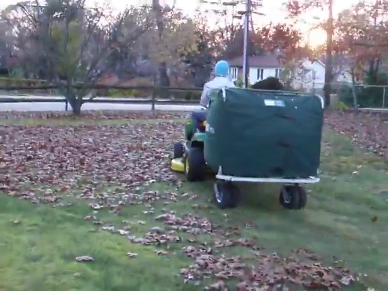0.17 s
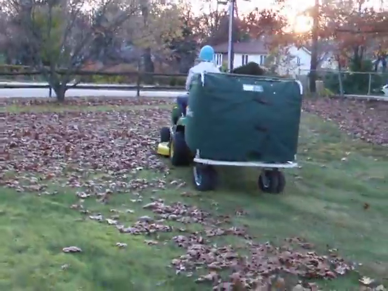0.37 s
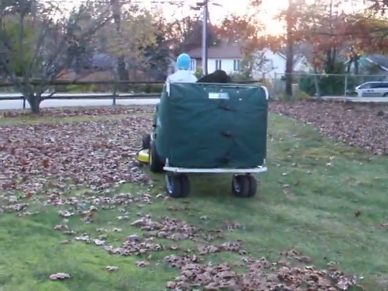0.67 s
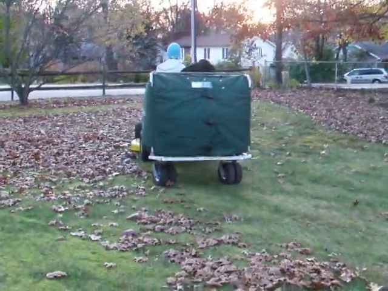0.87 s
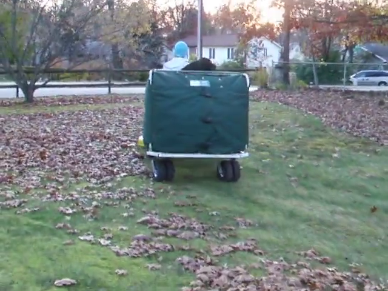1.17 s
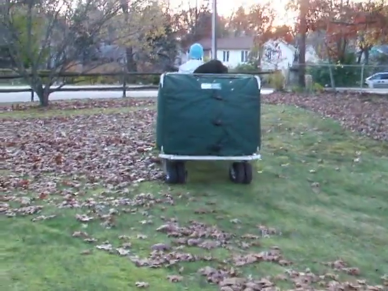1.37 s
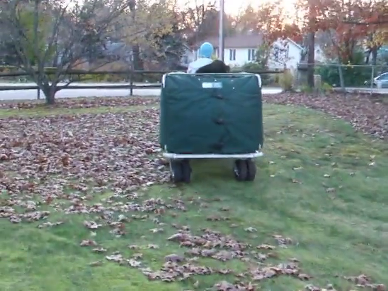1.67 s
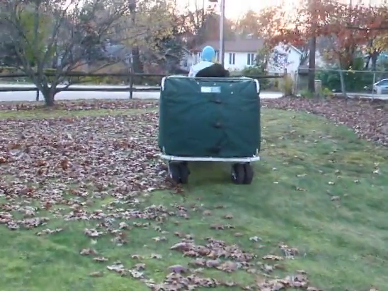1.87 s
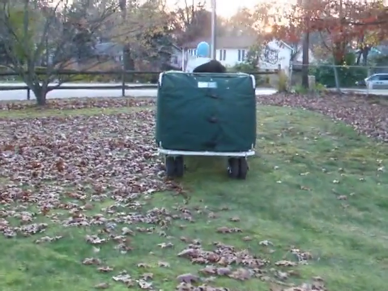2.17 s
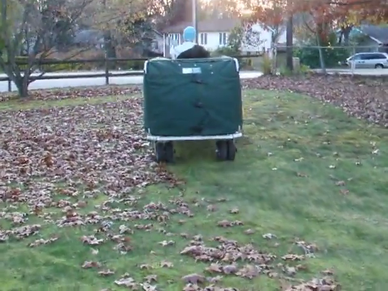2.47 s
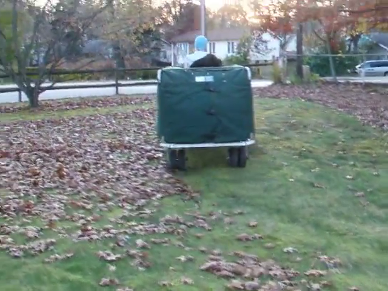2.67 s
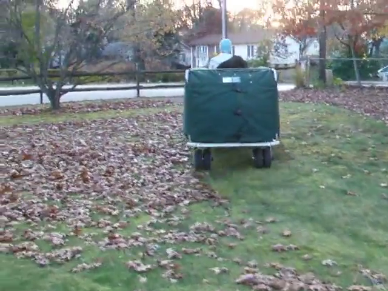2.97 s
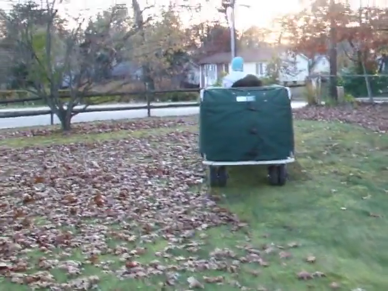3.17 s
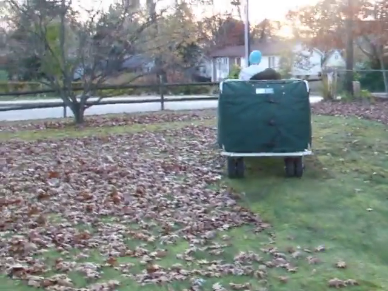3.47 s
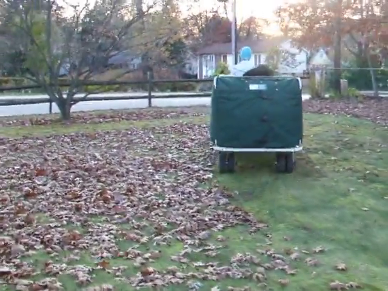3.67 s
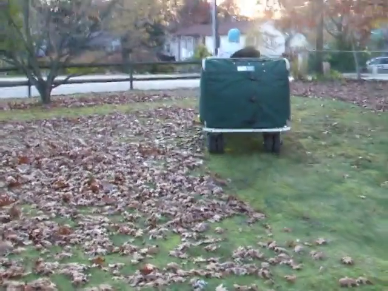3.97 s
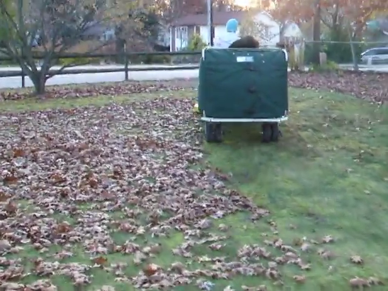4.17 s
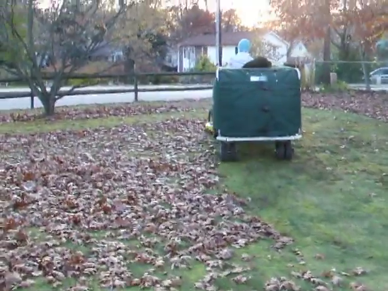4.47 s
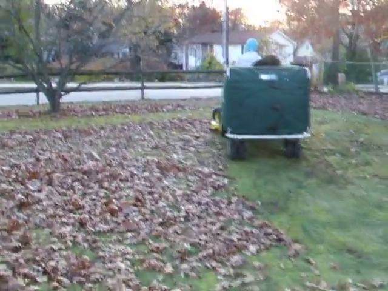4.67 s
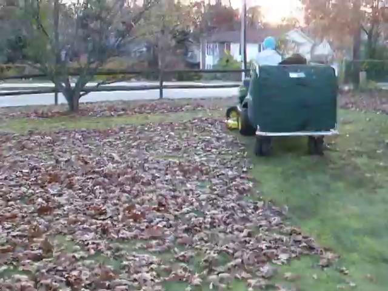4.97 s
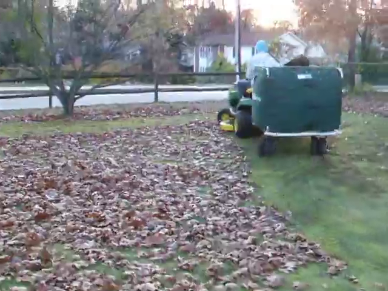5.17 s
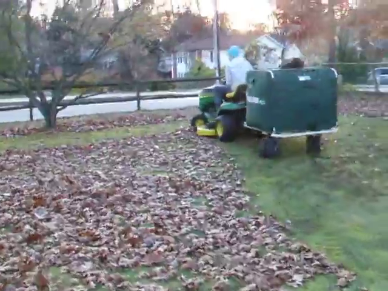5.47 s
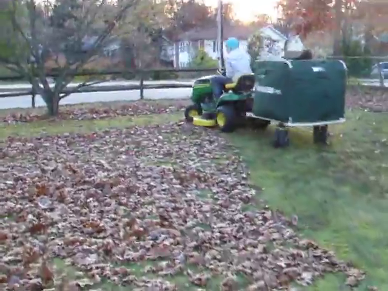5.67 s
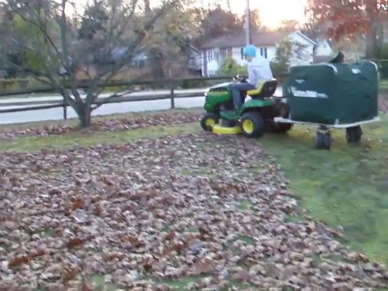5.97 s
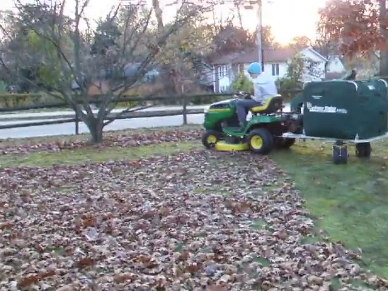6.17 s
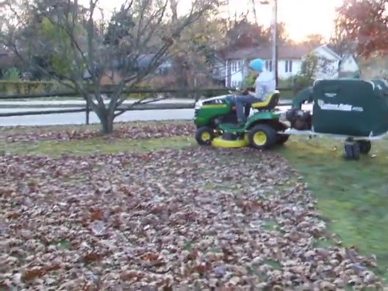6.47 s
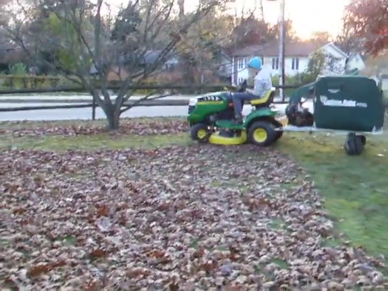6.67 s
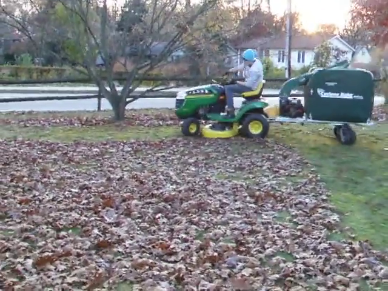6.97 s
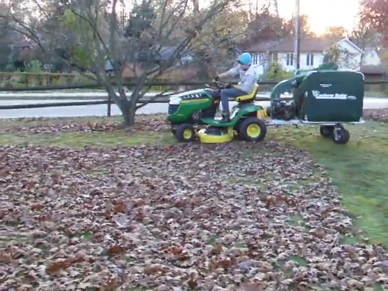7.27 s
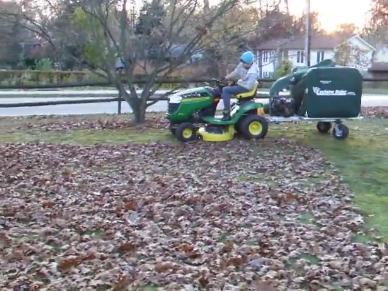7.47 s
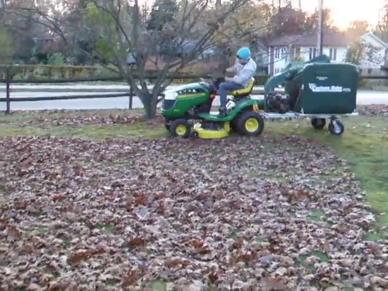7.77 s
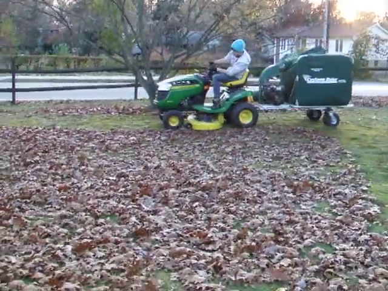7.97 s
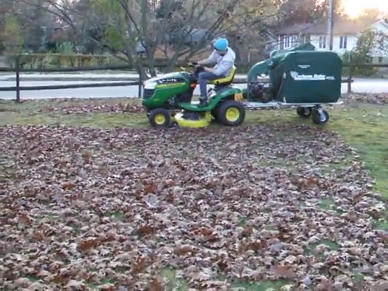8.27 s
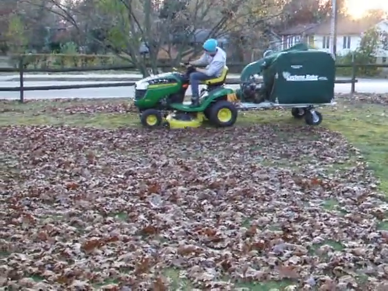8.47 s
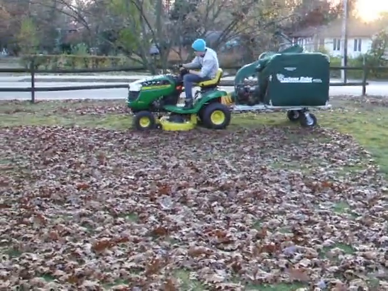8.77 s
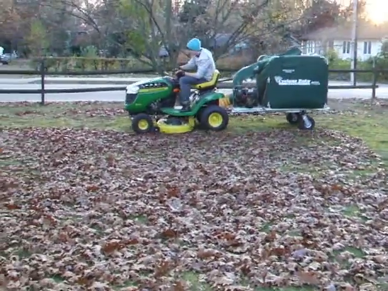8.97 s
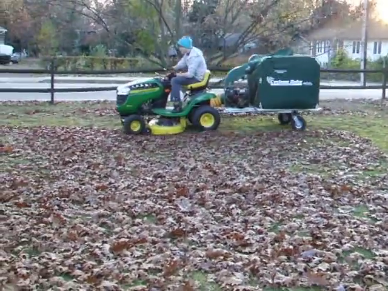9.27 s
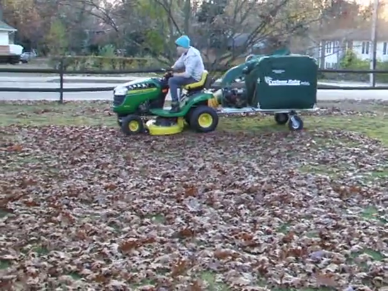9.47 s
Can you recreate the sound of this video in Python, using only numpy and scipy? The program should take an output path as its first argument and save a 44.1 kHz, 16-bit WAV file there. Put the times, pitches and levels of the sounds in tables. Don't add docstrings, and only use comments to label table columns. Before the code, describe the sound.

A continuous machine drone over an open lawn: thick, slightly wavering vacuum-fan hum, rough engine tones, buzzing mower blades, low rumble and rushing air. It recedes slightly, then turns broadside. The hum drops back while a raspy, rapidly chugging hiss comes forward, with brittle bursts of leaves and twigs in the fan. Plain, slightly gritty camera sound with limited treble.

```python
import sys
import numpy as np
from scipy import signal
from scipy.fft import rfft, irfft
from scipy.io import wavfile
from scipy.ndimage import uniform_filter1d

SR = 44100
rng = np.random.default_rng(int(sys.argv[2]) if len(sys.argv) > 2 else 0)


def convert_level_to_amplitude(level_db):
    exponent = np.asarray(level_db, float) / 20
    return 10 ** exponent


def wav_record(signal):
    frames = np.transpose(np.atleast_2d(signal))
    bounded = np.clip(frames, -1, 1)
    quanta = np.round(bounded * 32767).astype(np.int16)
    wavfile.write(sys.argv[1], SR, quanta)


N = 424241

# [t/s, f/Hz]
FAN_PITCH = [(0, 230.42), (.53, 228.43), (1.05, 231.01), (2.06, 230.45), (2.14, 228.51), (3.11, 229.35),
             (3.48, 228.48), (3.58, 229.86), (4.8, 230.26), (5.49, 229.06), (5.72, 231.31), (5.88, 227.75),
             (6.74, 228.89), (7.04, 230.71), (8.22, 230.54), (8.31, 232.0), (9.17, 228.65), (9.62, 229.02)]
# [t/s, level/dB]
FAN_LEVEL = [(0, -17), (.62, -16.5), (1.63, -16.5), (3.02, -16.5), (4.39, -15), (5.6, -18.5), (6.4, -19.5),
             (7.1, -17.5), (7.72, -26.5), (8.3, -19), (8.82, -21), (9.62, -20.5)]
# [multiple of firing rate, level from behind/dB, level from the side/dB]
VACUUM_TONES = [(1, -51.5, -56.5), (2, -46, -38), (3, -63, -56), (4, -46.5, -38), (5.03, -43, -39.5),
                (6, -47.5, -48.5), (7, -36.5, -42.5), (9, -37.5, -38), (10, -42.5, -48.5), (11, -57, -54),
                (13, -63, -56), (15, -54, -64.5), (16, -42.5, -49), (18, -59, -62), (20, -52, -55.5),
                (21, -54, -63), (23, -56, -62.5)]
# [t/s, firing cycle f/Hz]
TRACTOR_PITCH = [(0, 26.95), (1.5, 26.9), (2.3, 26.95), (4.8, 26.96), (5.7, 26.8), (6.3, 26.9),
                 (7.2, 26.97), (7.7, 27.13), (8.2, 26.95), (8.7, 26.88), (9.2, 27.02), (9.62, 27.05)]
# [multiple of firing rate, level from behind/dB, level from the side/dB]
TRACTOR_TONES = [(1, -61.5, -54), (2, -54, -49), (3, -55, -51), (4, -46, -48.5), (5, -43.5, -47),
                 (6.1, -48, -50.5), (8, -45, -46), (10, -50, -57), (12, -59, -51.5), (13, -61, -52.5),
                 (14, -63.5, -54), (15, -58, -51.5), (16, -51.5, -53.5), (18, -61.5, -54), (19, -63, -53),
                 (20, -52, -60.5), (22, -58, -56.5), (24, -54, -54), (28, -62, -52), (30, -70, -62),
                 (32, -67, -62.5), (36, -54.5, -51), (40, -63, -63)]
# [t/s, turned side-on 0 to 1, nearness level/dB]
POSE = [
    (0, 0.14, 0),
    (1.5, 0.29, 2),
    (3, 0.22, 0),
    (4.6, 0.17, -4.5),
    (5.5, 0.51, -3),
    (6.5, 0.87, 0),
    (7.7, 0.97, 1),
    (9.62, 0.93, 0.5),
]
# [multiple of blade rate, level/dB]
BLADE_OVERTONES = [(3, -51), (4, -55.5), (6, -53.5), (7, -52.5)]
# [t/s, level/dB, length/s]
CLUMPS = [(0.42, -30.5, 0.024), (0.731, -31.5, 0.01), (1.401, -26.5, 0.015), (1.463, -35, 0.04),
          (1.566, -30, 0.016), (1.996, -36.5, 0.014), (2.16, -31, 0.027), (3.996, -35, 0.033),
          (5.171, -39.5, 0.045), (5.797, -45, 0.033), (7.589, -33.5, 0.014), (7.63, -27, 0.018),
          (7.656, -27.5, 0.016), (7.689, -20, 0.033), (7.81, -26, .014), (7.937, -28, .014),
          (7.956, -26, 0.021), (8.043, -27.5, 0.033), (8.142, -29, 0.011), (8.84, -25.5, .045),
          (9.279, -26, 0.025), (9.394, -28, .015), (9.42, -27.5, .022), (9.57, -26, .012)]
# [t/s, flow level over the usual/dB]
LEAF_FLOW = [(0, 5.5), (.15, 5), (.7, 2.5), (1.3, 2), (1.5, 3.5), (1.75, 0.5), (2.4, 1.5), (3.3, 2),
             (3.95, 0.5), (4.6, -2), (5.2, -0.5), (6.2, 0.5), (7.1, -4), (7.35, 0), (7.68, 1), (8.2, 2),
             (8.6, -0.5), (9.62, 1)]
# [f/Hz, level per Hz/dB]
RUMBLE = [(1, -6), (5, -7), (12, -28.5), (25, -23.5), (40, -12), (70, -3.5), (110, 4), (160, 3), (210, -5),
          (280, 1), (330, -17), (450, -36.5)]
# [f/Hz, level per Hz/dB]
ROAR_REAR = [(180, -31.5), (300, -2), (400, -9), (500, -2), (570, 0.5), (630, -8), (780, -6), (870, -14.5),
             (1000, -11), (1150, -8), (1380, -20), (1560, -11), (2200, -23.5), (2900, -44.5)]
# [f/Hz, level per Hz/dB]
ROAR_SIDE = [(180, -30.5), (300, -3.5), (429, -9), (451, 0), (657, -1.5), (691, -0.5), (763, 2.5),
             (917, -5.5), (1100, 1), (1320, -4), (2200, -7), (2860, -17.5), (4840, -120)]
# [f/Hz, level per Hz/dB]
HISS_REAR = [(900, -30.5), (1500, -9.5), (2100, -6), (3300, -6), (4350, -7.5), (5350, -3), (5800, -5.5),
             (7100, -4), (8000, -7), (8400, -4.5)]
# [f/Hz, level per Hz/dB]
HISS_SIDE = [(900, -32.5), (1500, -8.5), (2200, -1), (2900, -4), (3900, -2.5), (4550, -3.5), (5000, 0.5),
             (6900, -1), (8000, -4), (8400, 7.5)]
# [f/Hz, level/dB]
SMOOTHING = [(6500, 0), (7400, 1.5), (8000, -3), (8370, -10.5), (8700, -22), (9000, -35.5), (9300, -44)]

BLADE_START, FIRING_AT = 0.44, 0.816
SHELL_DB, SHELL_HIDDEN_DB = -49, -23.5
SHELL_REAR_HZ, SHELL_SIDE_HZ, SHELL_SHIFT_S = 3370, 3850, 7.0
BELT_RATIO = 3.461
PASS_DB, SHADOW_DB = -36, -13.5
SHADOW_START_S, SHADOW_END_S, EDGE_S = 2.17, 6.0, 0.9
OCTAVE_DB, SWING_DB, SWING_S, SWING_TOP_S = -36.5, 3.5, 4.65, 2.4
THUD_DB = 1
SWISH_S, SWISH_LENGTH_S, SWISH_DB = 5.05, 1.13, -37
SWISH_START_HZ, SWISH_END_HZ = 775, 580
LOW_NOTE_LAG_S, LOW_NOTE_DB, LOW_NOTE_HZ = 0.28, -39.5, 510.0
HISS_DB, HISS_TURN_DB = -39, 10
ROAR_DB, ROAR_TURN_DB, ROAR_SHARE = -35.5, 3, 0.37
ROAR_NEAR, START_DB, START_S = 0.2, 5, 0.12
RUMBLE_DB, RUMBLE_NEAR, RUMBLE_SWAY_DB = -34, 0.17, 0.8
CAMERA_RATE, OFFSET = 16000, -0.0024


def evened(x):
    return x / np.sqrt(np.mean(x ** 2) + 1e-20)


def columns(rows):
    s, *values = np.transpose(rows)
    t = np.arange(N) / SR
    return [np.interp(t, s, v) for v in values]


def ramp(at, length):
    return np.clip((np.arange(N) / SR - at) / length + 0.5, 0, 1)


def drift(hz):
    f = np.fft.rfftfreq(N, 1 / SR)
    slow = rfft(rng.standard_normal(N)) * np.exp(-(f / hz) ** 2)
    return evened(irfft(slow, N))


def resonate(x, hz, width):
    turn = np.exp(2j * np.pi * np.cumsum(hz) / SR)
    r = np.exp(-np.pi * width / SR)
    once = signal.lfilter([1 - r], [1, -r], x / turn)
    twice = signal.lfilter([1 - r], [1, -r], once)
    return evened((turn * twice).real)


def noise(spectrum, patchy_db, size=512):
    frames, hz = 4 * N // size + 5, np.fft.rfftfreq(size, 1 / SR)
    a, b, patches = rng.standard_normal((frames, len(hz), 3)).T
    patches = uniform_filter1d(patches, size=6, axis=0)
    patches = evened(uniform_filter1d(patches, size=24, axis=1))
    f, db = np.transpose(spectrum)
    shape_db = np.interp(np.log(hz + 1), np.log(f + 1), db, left=-90, right=-90)
    z = (a + 1j * b) * convert_level_to_amplitude(shape_db[:, None] + patchy_db * patches)
    return evened(signal.istft(z, nperseg=size, noverlap=3 * size // 4)[1][:N])


def fan(cycle):
    wobble = 0.07 * drift(hz=25) + 0.43 * drift(hz=3.4)
    tone = np.sqrt(2) * np.cos(2 * np.pi * (8 * cycle + BLADE_START) + wobble)
    flutter_db = 0.5 * drift(hz=25.3) + 0.3 * drift(hz=19)
    firing_db = 0.2 * np.cos(2 * np.pi * (cycle - 0.3))
    return convert_level_to_amplitude(columns(FAN_LEVEL)[0] + flutter_db + firing_db) * tone


def engine_tones(cycle, table, side, near_db, waver_db):
    out, t = np.zeros(N), np.arange(N) / SR
    knots = np.arange(0, N / SR + 1, 0.01)

    def waver():
        steps = uniform_filter1d(rng.standard_normal(len(knots)), size=12)
        return np.interp(t, knots, evened(steps))

    for order, rear_db, side_db in table:
        swell, slip = waver(), waver()
        unrest = np.sqrt(order / 8)
        level_db = rear_db + side * (side_db - rear_db) + near_db + waver_db * unrest * swell
        angle = 2 * np.pi * (round(order) * cycle + rng.random()) + 0.27 * unrest * slip
        out += convert_level_to_amplitude(level_db) * np.cos(angle)
    return np.sqrt(2) * out


def engines(cycle, side, near_db):
    tractor_cycle = np.cumsum(columns(TRACTOR_PITCH)[0]) / SR
    vacuum = engine_tones(cycle, VACUUM_TONES, side, near_db, 2.63)
    tractor = engine_tones(tractor_cycle, TRACTOR_TONES, side, near_db, 2.0)
    return vacuum + tractor


def puffs(cycle):
    since = cycle - FIRING_AT
    sizes = convert_level_to_amplitude(0.9 * np.clip(rng.standard_normal(400), -2, 1.5))
    size = sizes[np.floor(since).astype(int) + 1]
    return uniform_filter1d(size * np.exp(-(since % 1) / 0.15), size=170)


def muffler(beat, side):
    hz = np.interp(ramp(SHELL_SHIFT_S, 0.3), (0, 1), (SHELL_REAR_HZ, SHELL_SIDE_HZ))
    level_db = SHELL_DB + SHELL_HIDDEN_DB * (1 - side) ** 2
    bursts = evened(np.maximum(beat - 0.15, 0))
    return convert_level_to_amplitude(level_db) * bursts * resonate(rng.standard_normal(N), hz, 620)


def mower_blades():
    hidden = ramp(SHADOW_START_S, EDGE_S) - ramp(SHADOW_END_S, EDGE_S)
    pass_db = PASS_DB + SHADOW_DB * hidden
    swing = np.cos(2 * np.pi * (np.arange(N) / SR - SWING_TOP_S) / SWING_S)
    octave_db = OCTAVE_DB + SWING_DB * swing
    hz = BELT_RATIO * columns(TRACTOR_PITCH)[0]
    angle = 2 * np.pi * np.cumsum(hz) / SR + 0.19 * drift(hz=4.5)
    first = convert_level_to_amplitude(pass_db + 1.3 * drift(hz=4.0)) * np.cos(angle)
    octave = convert_level_to_amplitude(octave_db + 2.0 * drift(hz=5.1)) * np.cos(2 * angle + 1)
    top = sum(convert_level_to_amplitude(db + 0.97 * drift(hz=1.0)) * np.cos(round(k) * angle) for k, db in BLADE_OVERTONES)
    return np.sqrt(2) * (first + octave + top)


def leaf_clumps(side):
    shape, t = np.zeros(N), np.arange(N) / SR
    for s, db, length in CLUMPS:
        part = slice(round(s * SR), round((s + 4 * length) * SR))
        u = (t[part] - s) / length
        shape[part] += convert_level_to_amplitude(db) * np.clip(u * 6, 0, 1) * np.exp(-1.5 * u)
    crackle = noise([(600, -23.5), (1500, -5), (3000, -2.5), (5500, 5.0), (8300, -6.0)], 3.7)
    thud = noise([(300, -14), (700, -0.5), (1200, -2), (2200, -6.5), (3500, -21.5)], 2.8)
    mix = (0.8 + 0.42 * side) * crackle + convert_level_to_amplitude(THUD_DB) * (1 - side) * thud
    return shape * convert_level_to_amplitude(2.7 * drift(hz=300)) * mix


def hose_swish():
    middle = SWISH_S + SWISH_LENGTH_S / 2
    early = ramp(middle, SWISH_LENGTH_S)
    late = ramp(middle + LOW_NOTE_LAG_S, SWISH_LENGTH_S)
    breath = rng.standard_normal(N)
    slide_hz = np.interp(early, (0, 1), (SWISH_START_HZ, SWISH_END_HZ))
    upper = np.sin(np.pi * early) * resonate(breath, slide_hz, 130)
    lower = np.sin(np.pi * late) * resonate(breath, np.full(N, LOW_NOTE_HZ), 120)
    return convert_level_to_amplitude(SWISH_DB) * upper + convert_level_to_amplitude(LOW_NOTE_DB) * lower


def air(beat, side, near_db):
    flow_db = columns(LEAF_FLOW)[0] + 0.27 * drift(hz=5.2)
    surge_db = START_DB * np.exp(-np.arange(N) / SR / START_S)
    roar_db = ROAR_DB + ROAR_TURN_DB * side + ROAR_SHARE * flow_db + ROAR_NEAR * near_db + surge_db
    hiss_db = HISS_DB + HISS_TURN_DB * side + flow_db
    rumble_db = RUMBLE_DB + RUMBLE_NEAR * near_db + RUMBLE_SWAY_DB * drift(hz=0.91)
    gusts = drift(hz=25.2)
    rear, turned = np.sqrt(1 - side), np.sqrt(side)
    roar = rear * noise(ROAR_REAR, 2.1, size=1024) + turned * noise(ROAR_SIDE, 1.0, size=1024)
    hiss = rear * noise(HISS_REAR, 0.84) + turned * noise(HISS_SIDE, 0.59)
    roar *= convert_level_to_amplitude(roar_db + 0.31 * gusts) * (0.93 + 0.29 * side * beat)
    hiss *= convert_level_to_amplitude(hiss_db + 0.77 * gusts) * (0.8 + 1.2 * side * beat)
    return convert_level_to_amplitude(rumble_db) * noise(RUMBLE, 1.0, size=4096) + roar + hiss


def scene():
    cycle = np.cumsum(columns(FAN_PITCH)[0]) / SR / 8
    side, near_db = columns(POSE)
    side = np.clip(side, 0, 1)
    beat = puffs(cycle)
    motors = fan(cycle) + engines(cycle, side, near_db) + muffler(beat, side) + mower_blades()
    leaves_and_air = leaf_clumps(side) + hose_swish() + air(beat, side, near_db)
    return (motors + leaves_and_air)[None]


def top_cut(x):
    return signal.sosfilt(signal.butter(12, 9030, fs=SR, output="sos"), x)


def record(dry):
    size = 10 * SR
    looped = np.concatenate([dry, dry[:, :-8001:-1], dry[:, size - N - 8000:0:-1]], axis=1)
    hz, z = np.fft.rfftfreq(size, 1 / SR), rfft(looped)
    fold = CAMERA_RATE * size // SR
    z[:, fold // 2 + 1:] = 0
    z[:, fold // 2:fold + 1] = np.conj(z[:, fold // 2::-1])
    f, db = np.transpose(SMOOTHING)
    smooth = irfft(z * convert_level_to_amplitude(np.interp(hz, f, db, right=-120)), size)[:, :N]
    return top_cut(smooth + OFFSET)


dry = scene()
out = record(dry)
wav_record(out)
```